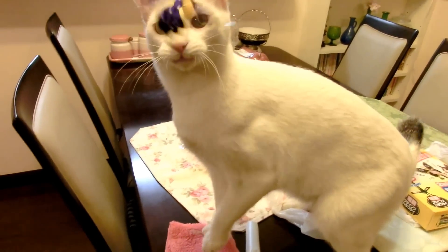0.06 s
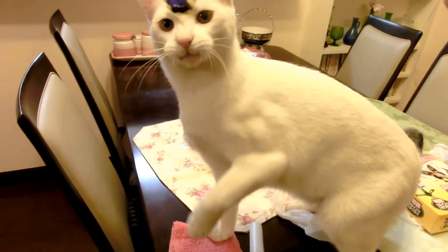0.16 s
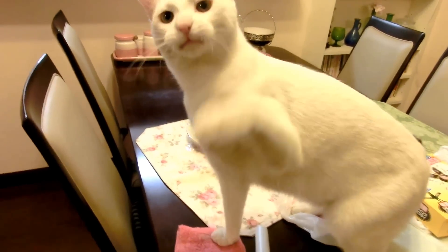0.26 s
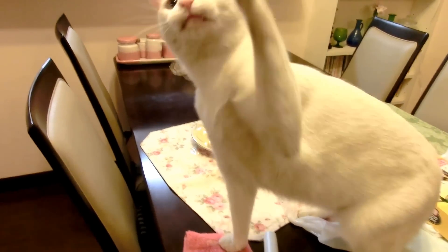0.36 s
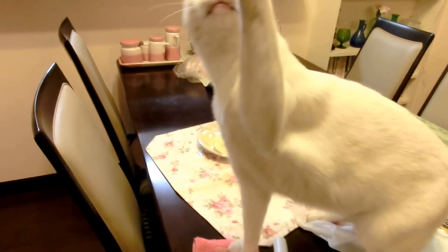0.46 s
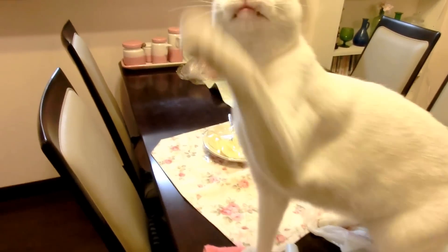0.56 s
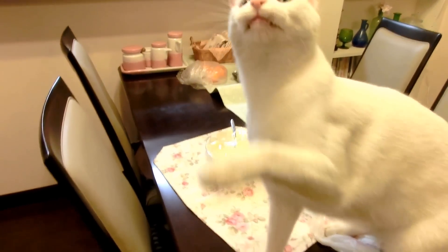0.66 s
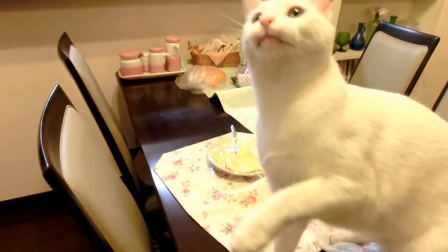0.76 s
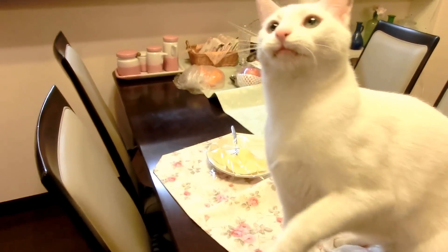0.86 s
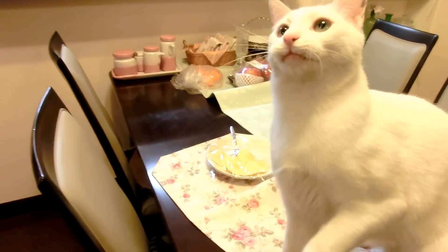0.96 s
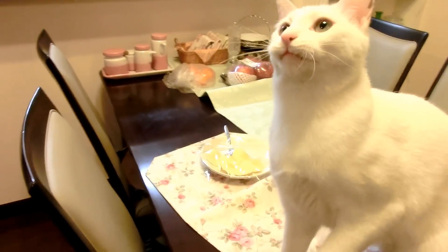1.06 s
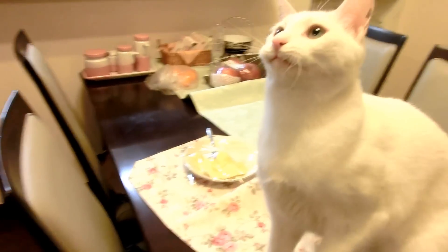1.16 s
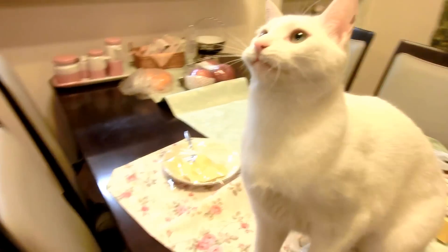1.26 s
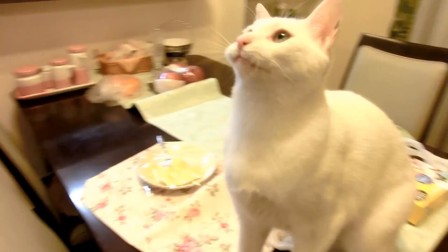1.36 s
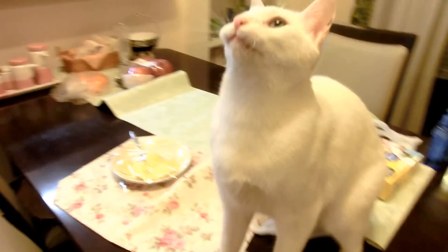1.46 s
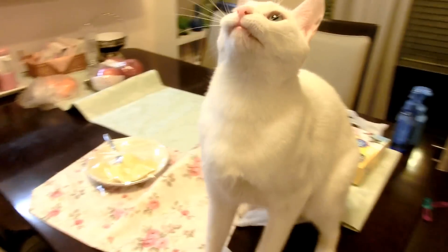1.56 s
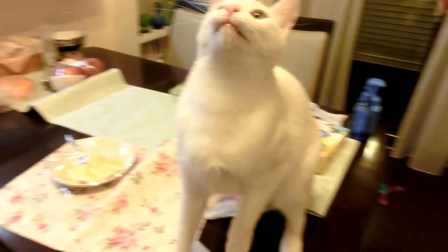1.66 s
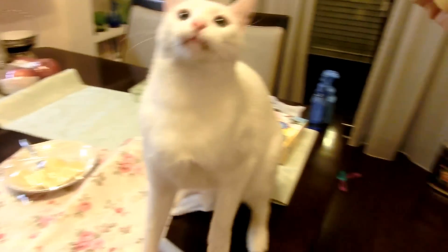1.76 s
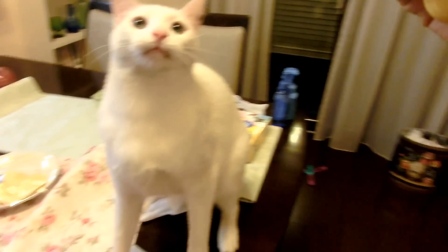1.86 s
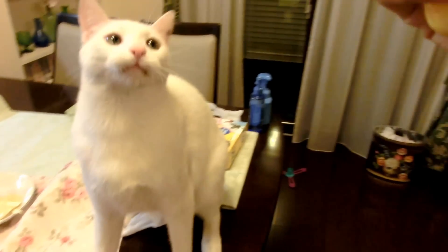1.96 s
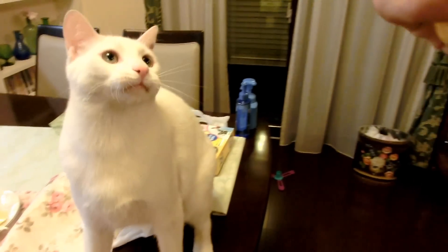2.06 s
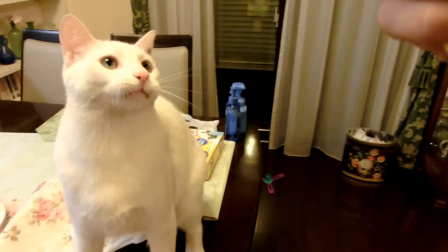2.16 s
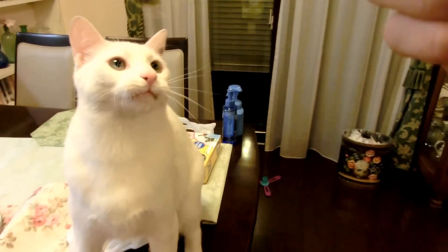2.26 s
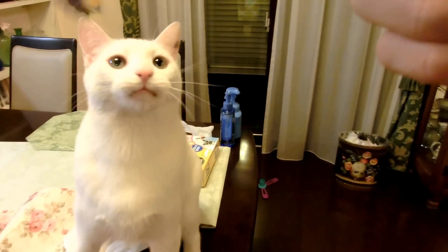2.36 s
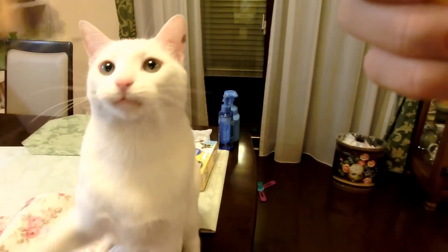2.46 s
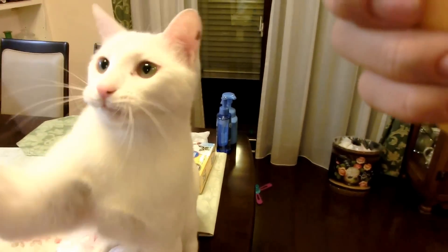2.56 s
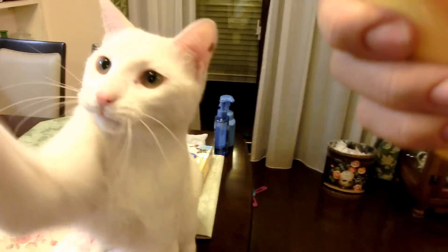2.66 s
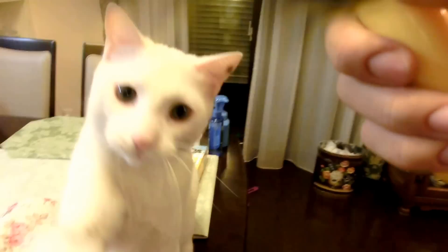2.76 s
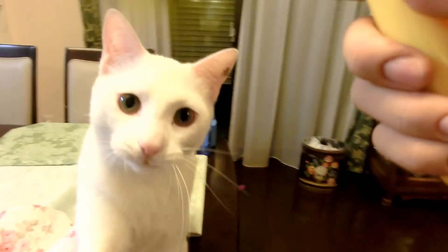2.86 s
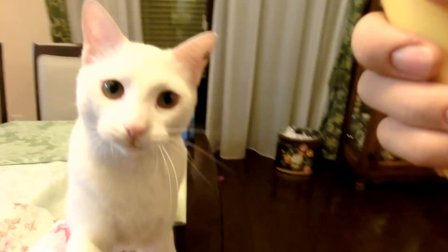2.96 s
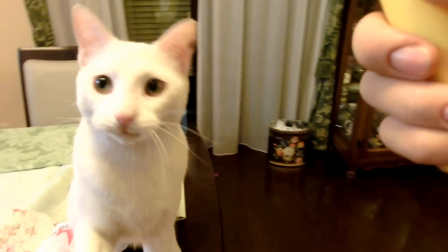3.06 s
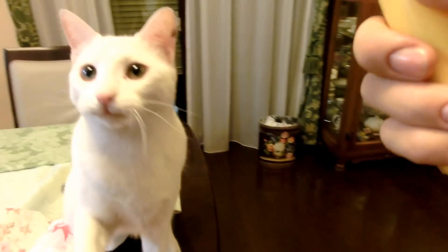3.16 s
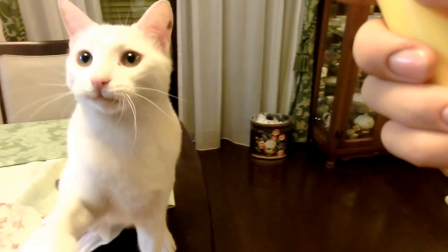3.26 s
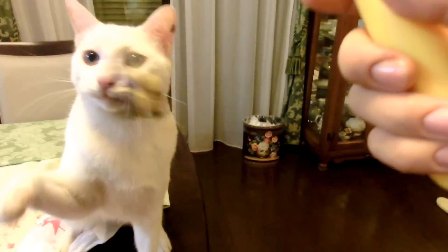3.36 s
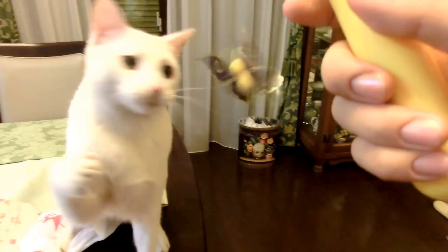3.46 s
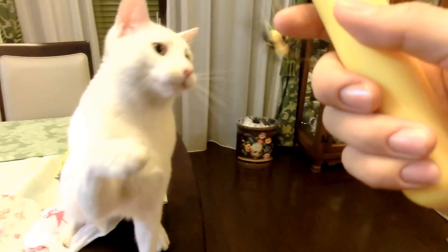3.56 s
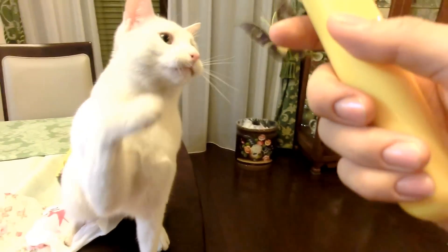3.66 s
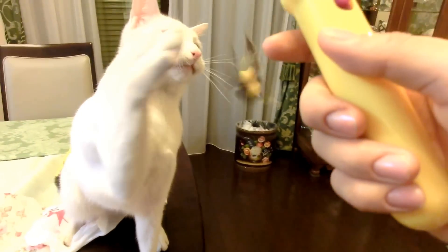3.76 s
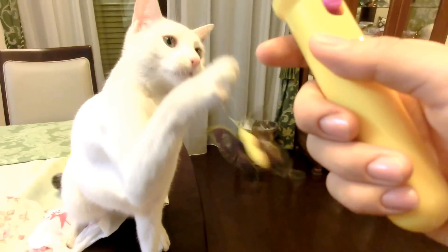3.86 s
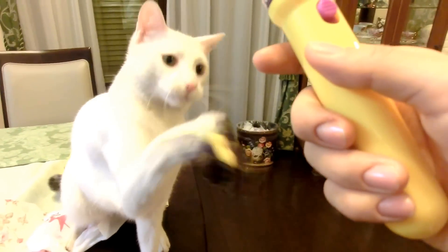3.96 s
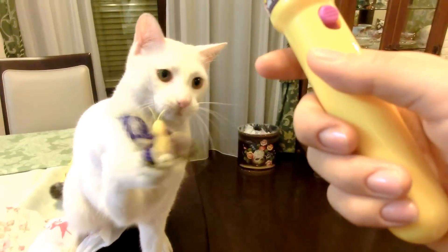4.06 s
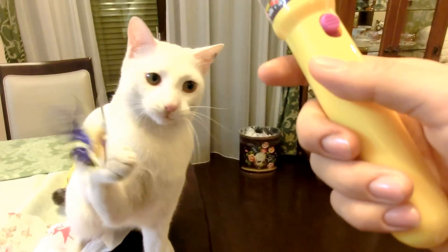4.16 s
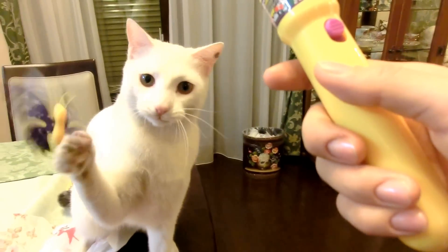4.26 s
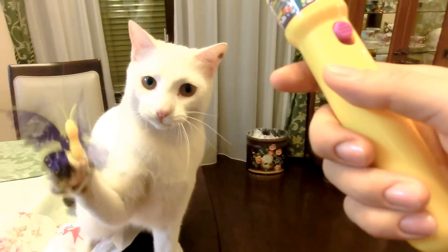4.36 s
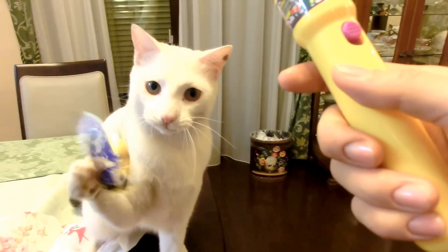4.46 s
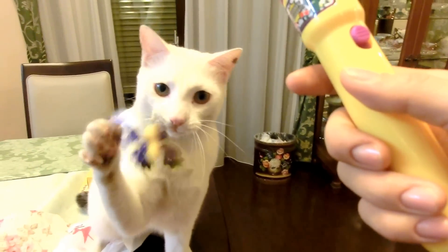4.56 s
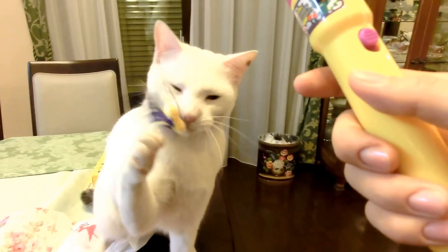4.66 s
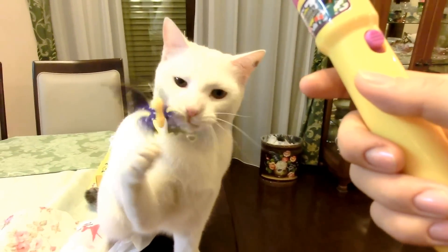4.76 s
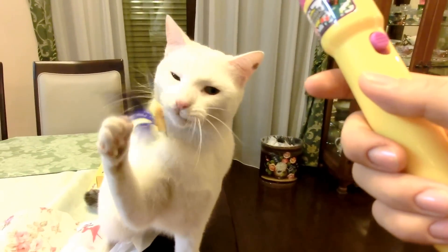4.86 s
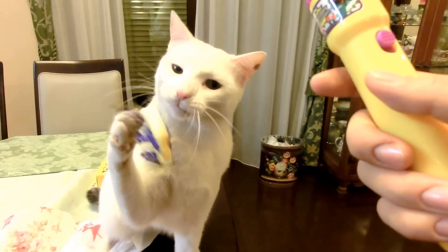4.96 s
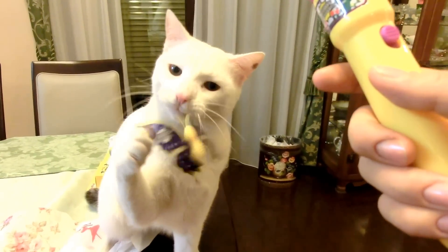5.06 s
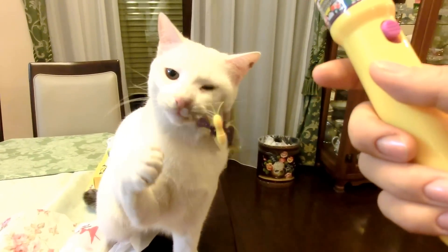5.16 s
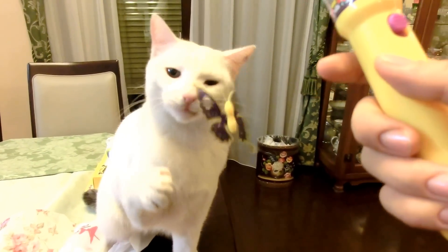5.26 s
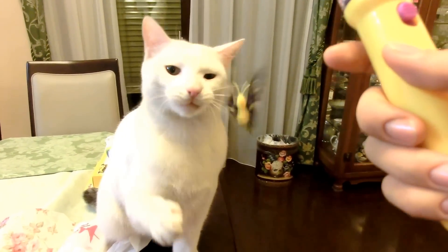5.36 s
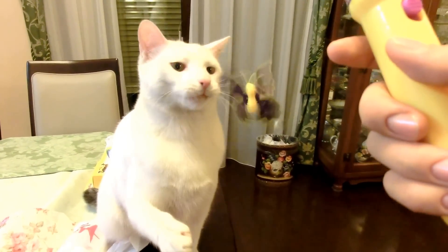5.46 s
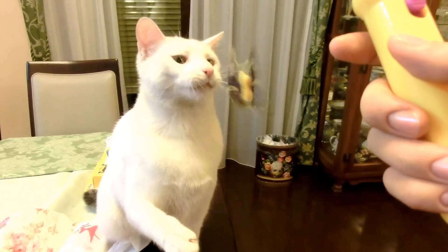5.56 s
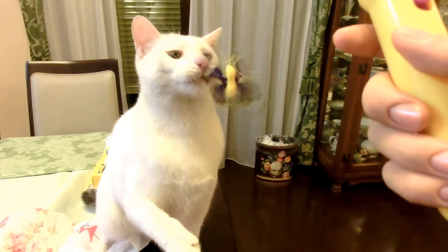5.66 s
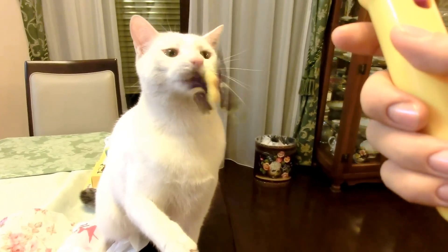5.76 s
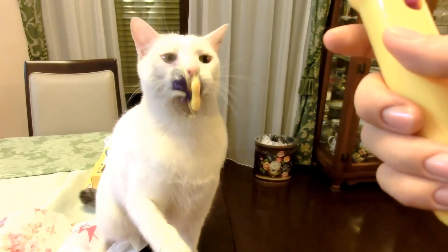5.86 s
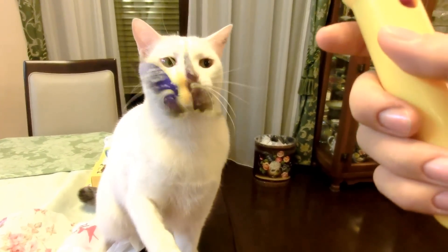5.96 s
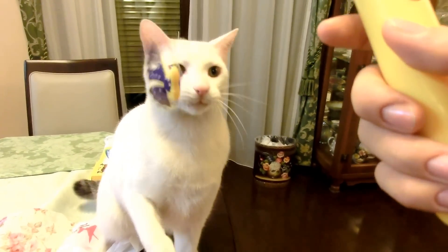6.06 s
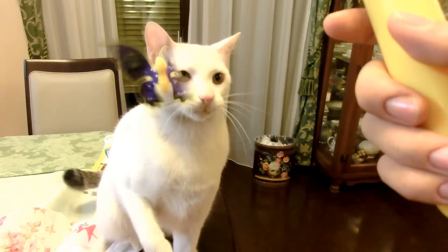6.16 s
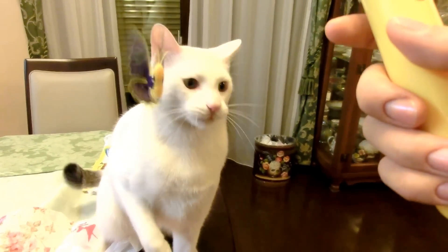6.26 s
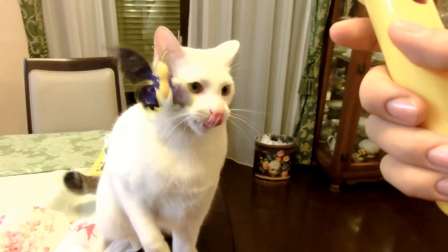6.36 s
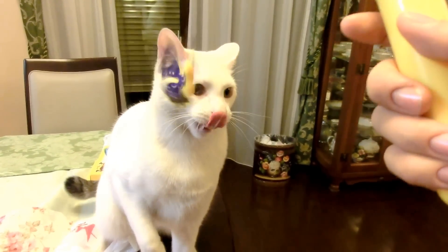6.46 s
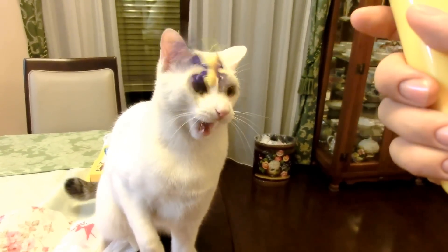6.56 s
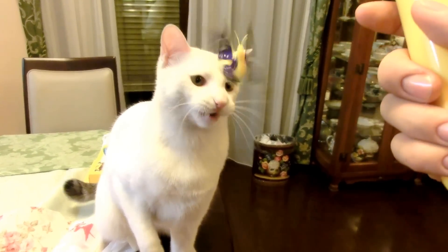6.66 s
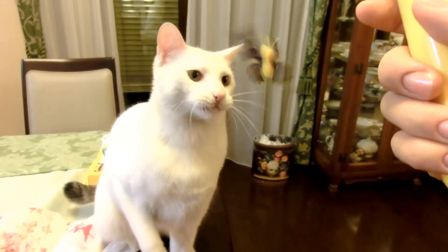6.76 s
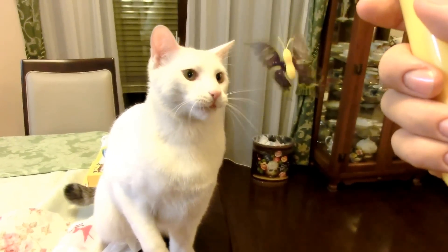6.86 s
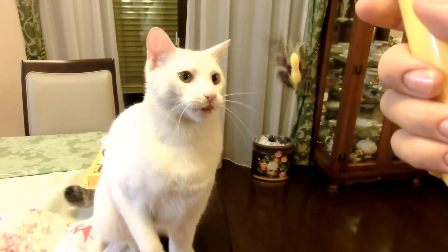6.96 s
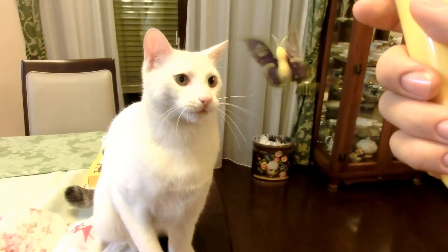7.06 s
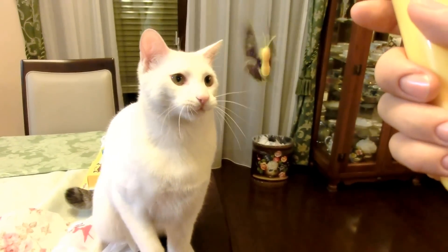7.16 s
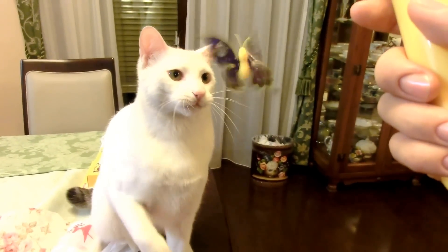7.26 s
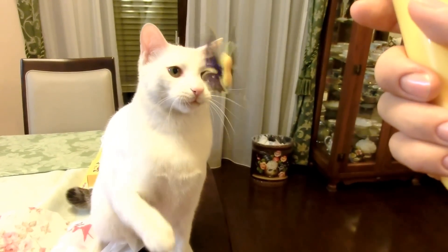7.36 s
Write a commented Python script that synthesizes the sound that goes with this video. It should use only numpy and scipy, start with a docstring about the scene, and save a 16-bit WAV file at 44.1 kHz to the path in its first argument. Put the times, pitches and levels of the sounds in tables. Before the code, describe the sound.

A small motor toy clacks and rattles about twenty-five times a second, bursts into a loud thumping crackle against the microphone, then resumes more quietly indoors.

```python
"""A furnished dining room, where a hand-held motor toy flaps a plastic butterfly about 25 times a second. Each
beat is a tick, a clack and a loose rattle: short bursts of noise that ring the plastic and the handle. Once the
wings beat against the microphone itself, with low thumps, rumble and crackling film. A paw drags on the table
top, made of soft slips that ring the board. The room's hum and hiss are bands of noise; the background level
dips for a while after the wings hit the microphone, then recovers."""
import sys
import numpy as np
from scipy import signal
from scipy.io import wavfile
from scipy.ndimage import uniform_filter1d

SR = 44100
rng = np.random.default_rng(int(sys.argv[2]) if len(sys.argv) > 2 else 0)


def elevation(decibels):
    """Turn decibel levels (scalar or array-like) into linear amplitude ratios."""
    levels = np.asarray(decibels, float)
    return 10 ** (levels / 20)


def int16_out(signal):
    """Quantize to a 16-bit WAV file."""
    q = np.round(np.clip(np.atleast_2d(signal).T, -1, 1) * 32767)
    wavfile.write(sys.argv[1], SR, q.astype(np.int16))


N = 326781

# background before the trims in room() and scene(): start_s, room_level_db, whir_and_rattle_level_db
BACKGROUND = [(0, -52.5, -42.5), (.45, -55, -44), (.51, -53.5, -40.5), (.67, -53, -39), (.8, -52.5, -41.5),
              (.9, -52.5, -42.5), (1.2, -53, -42), (1.65, -52.5, -41.5), (2.1, -53.5, -43.5),
              (2.55, -53.5, -41.5), (2.7, -49, -40), (2.79, -45, -39), (3.1, -52, -56), (3.2, -56.5, -51),
              (3.27, -58.5, -44), (3.34, -57, -44), (3.45, -63, -52.5), (3.7, -59, -51),
              (3.88, -60.5, -48.5), (3.93, -58, -48.5), (4.05, -59.5, -52.5), (4.22, -60, -51),
              (4.3, -57, -46.5), (4.55, -57, -48), (4.68, -57.5, -48.5), (4.9, -54.5, -43),
              (5.05, -53, -43.5), (5.2, -52.5, -47), (5.36, -55.5, -44.5), (5.42, -51, -43.5),
              (5.7, -53, -44.5), (6.5, -53.5, -44.5), (6.95, -52.5, -43.5), (7.41, -54, -44.5)]
# loudness of the room noise over pitch, relative: pitch_hz, level_db (per Hz)
ROOM_SPECTRUM = [(12, -60), (20, 3), (46, -2.5), (167, -10.5), (245, -12.5), (309, -9.5), (540, -17),
                 (980, -14), (1680, -23.5), (2000, -10.5), (2600, -33), (4400, -120)]
# loudness of the motor whir over pitch, relative: pitch_hz, level_db (per Hz)
WHIR_SPECTRUM = [(1000, -40), (1700, -24), (2390, 10), (2810, -1), (3360, 4.5), (6890, 9.5), (10700, 5),
                 (13000, -20), (15400, -18), (16300, -28)]
# how alike left and right are: pitch_hz, likeness (0 to 1)
LEFT_RIGHT_LIKENESS = [(60, 0.77), (200, 0.74), (700, 0.74), (2400, 1), (4400, 0.89), (8000, 0.65),
                       (15000, 0.35)]
# drags of the paw on the table: middle_s, level_db
PAW_DRAGS = [(1.712, -43.5), (1.81, -62.5), (5.91, -55)]
# ringing tones of the table top: pitch_hz, width_hz, level_db
TABLE_MODES = [(162, 42, 1), (240, 60, -15), (313, 29, 1), (510, 98, 2), (680, 110, -13), (810, 66, -19),
               (1060, 120, -14), (1450, 600, -8)]
# wings against the microphone: start_s, air_level_db (air in the ports), film_level_db (crackling film)
WING_BUFFET = [(2.808, -84, -80), (2.815, -27, -35), (2.85, -29, -27), (2.865, -30, -55), (2.9, -29, -35),
               (2.939, -28.5, -31), (2.972, -36, -75), (2.99, -36.5, -27), (3.037, -35.5, -81),
               (3.055, -25.5, -29), (3.075, -35.5, -41), (3.091, -44, -67), (3.12, -59.5, -79),
               (3.14, -81, -89)]
# thumps of the wings on the microphone: start_s, peak_level_db
WING_THUMPS = [(2.813, -25.5), (2.825, -33), (2.839, -20.5), (2.851, -28), (2.862, -41), (2.8713, -12),
               (2.886, -21), (2.921, -20), (2.93, -34), (2.953, -31), (3.004, -32), (3.043, -19.5),
               (3.053, -43)]
# hardest knocks of the motor in the handle: start_s, peak_level_db
MOTOR_KNOCKS = [(0.527, -35), (0.685, -45), (0.74, -46), (1.136, -40.5), (2.417, -43), (2.496, -39),
                (4.223, -43.5), (4.473, -43), (4.492, -41), (4.724, -43.5), (4.971, -37.5), (5.037, -41.5),
                (5.118, -36.5), (5.164, -40), (5.2, -39), (5.398, -38.5), (5.505, -35), (5.817, -39.5),
                (6.091, -40.5), (6.759, -39)]
# ringing tones of the hollow handle: pitch_hz, width_hz, level_db
HANDLE_MODES = [(850, 70, 12), (1002, 160, 19.5), (1290, 390, 18.5)]
# ringing tones of the plastic shell and wings: pitch_hz, width_hz, level_db
SHELL_MODES = [(2280, 760, 6), (3330, 620, 1.5), (4600, 1670, -2), (5900, 900, -1.5), (7580, 1030, -1.5),
               (8800, 850, 1), (9700, 770, 1.5), (10800, 700, 3), (11980, 950, 0), (12730, 350, -2),
               (13920, 930, -2)]
# ticks and clacks of the crank and wings: start_s, peak_level_db, colour_centre_hz, length_ms
WING_CLACKS = [(0.0305, -22.5, 5300, 2.1), (0.034, -23, 7400, 2.7), (0.069, -27, 5900, 2.1),
               (0.0746, -21, 5600, 1.8), (0.1153, -20, 9450, 2.2), (0.154, -19.5, 8400, 3.2),
               (0.1934, -20, 9400, 1.1), (0.231, -18.5, 8800, 2), (0.272, -19.5, 9100, 1.6),
               (0.312, -19.5, 8800, 2.2), (0.349, -19, 8100, 3.4), (0.389, -21.5, 7500, 1.5),
               (0.424, -25.5, 6300, 0.51), (0.4289, -26, 6960, 1.2), (0.468, -21, 4370, 1.5),
               (0.4915, -31, 4500, 6), (0.507, -18.5, 5900, 4.3), (0.514, -24, 6540, 7.7),
               (0.5463, -21.5, 6600, 9.6), (0.5776, -24.5, 10100, 2.8), (0.5814, -15, 10800, 0.98),
               (0.6139, -27, 3800, 9.2), (0.621, -16.5, 7800, 6.4), (0.6428, -20.5, 4740, 1.5),
               (0.648, -18.5, 6530, 6.2), (0.6662, -29.5, 5600, 0.6), (0.672, -31, 5500, 1.5),
               (0.705, -17.5, 8800, 3.1), (0.742, -10.5, 8050, 2), (0.7893, -33, 6500, 2.1),
               (0.82, -25, 5400, 1.03), (0.826, -24.5, 6470, 1.3), (0.8608, -15, 8600, 0.9),
               (0.904, -33.5, 6400, 2.4), (0.946, -19, 6800, 2.1), (0.9795, -20, 6840, 6.7),
               (1.02, -22, 5950, 2.8), (1.0633, -18, 8930, 1.83), (1.0997, -12.5, 8550, 0.94),
               (1.1368, -13, 8510, 1.2), (1.18, -19, 8800, 0.92), (1.22, -19, 8500, 1.2),
               (1.2545, -15, 8260, 1.6), (1.296, -22, 8800, 3.5), (1.339, -20, 7280, 2.1),
               (1.375, -16, 9400, 0.92), (1.4134, -17, 6700, 1.5), (1.456, -23, 8000, 1.74),
               (1.479, -29.5, 8000, 2.2), (1.49, -19, 3700, 0.76), (1.495, -21, 8070, 1.5),
               (1.5302, -13.5, 8800, 1.25), (1.572, -25.5, 6750, 2.7), (1.6133, -20, 8800, 1.7),
               (1.649, -18, 7030, 2.4), (1.688, -16.5, 7800, 1), (1.7, -28.5, 3200, 2.4),
               (1.7245, -24.5, 3600, 1.75), (1.731, -21, 8060, 1.5), (1.753, -32.5, 7190, 0.9),
               (1.7632, -29.5, 3700, 2.9), (1.769, -23.5, 7900, 1.5), (1.807, -18.5, 6440, 0.8),
               (1.818, -26.5, 3370, 1.5), (1.85, -20.5, 6080, 0.75), (1.883, -24, 3230, 1.2),
               (1.887, -25, 8140, 1.2), (1.9205, -20, 5460, 1.06), (1.9244, -21, 7000, 1.9),
               (1.9597, -28, 4480, 2.3), (1.9656, -20, 8800, 1.7), (2, -23.5, 5410, 2),
               (2.0063, -18.5, 9000, 1.2), (2.043, -18, 8000, 1.17), (2.082, -17, 9300, 1.5),
               (2.1245, -20.5, 9050, 1.74), (2.1623, -21.5, 5900, 1.7), (2.2, -15.5, 6910, 1.2),
               (2.202, -22.5, 4500, 7.3), (2.2424, -22.5, 6300, 2.2), (2.2756, -25.5, 4950, 1.85),
               (2.2826, -23.5, 8000, 2), (2.319, -14.5, 7460, 2.05), (2.3223, -17, 4600, 1),
               (2.3585, -17.5, 8500, 1.5), (2.4016, -23.5, 7520, 1.6), (2.4385, -22.5, 7580, 0.58),
               (2.4733, -21.5, 5040, 0.94), (2.475, -21.5, 6800, 3.6), (2.517, -27.5, 7460, 3.3),
               (2.558, -19, 6740, 1.2), (2.594, -20.5, 5950, 4.5), (2.5988, -21, 3700, 5.7),
               (2.6338, -18.5, 6260, 3.6), (2.6761, -16, 6180, 0.72), (2.712, -18.5, 6160, 5.4),
               (2.732, -16, 7070, 4.7), (2.7571, -20.5, 6240, 4.2), (2.795, -21.5, 6600, 1.8),
               (2.815, -7, 5900, 9.3), (2.838, -14, 7000, 6.9), (2.8439, -3.5, 8350, 1.5),
               (2.8652, -17, 5500, 0.6), (2.8712, -7, 6500, 0.67), (2.8755, 5.5, 4070, 1.7),
               (2.8833, -19, 10000, 2.5), (2.887, -27, 3500, 1.1), (2.894, -17, 7000, 3),
               (2.896, -23, 5000, 1.8), (2.919, -12.5, 4470, 0.8), (2.924, -12, 5770, 3.1),
               (2.933, -13, 5400, 2.1), (2.955, -11, 4600, 2.6), (2.9585, -6, 4960, 2.7),
               (2.982, -22, 9000, 5), (2.9825, -19, 4100, 2.7), (2.987, -12, 5040, 0.48),
               (2.9908, -12, 8100, 4), (3.0053, -11, 7250, 1.1), (3.0142, -8.5, 4500, 0.54),
               (3.0233, -14, 7000, 0.8), (3.025, -9, 6500, 2.4), (3.028, -15, 8500, 2),
               (3.0467, -10, 6040, 3.7), (3.052, -19, 5800, 1.7), (3.059, -14, 6400, 1.9),
               (3.0628, -15, 6370, 3.2), (3.067, -23, 5100, 2.3), (3.1003, -26.5, 5900, 0.46),
               (3.105, -32.5, 7500, 1.3), (3.1203, -28, 6500, 1.8), (3.1461, -27.5, 5130, 2.2),
               (3.1846, -25.5, 6200, 2.9), (3.222, -22.5, 6390, 5.3), (3.26, -22.5, 7100, 5.8),
               (3.265, -23, 6600, 2.9), (3.3002, -21.5, 6250, 1.53), (3.334, -24, 8300, 6.7),
               (3.375, -33.5, 6600, 2.6), (3.4156, -28.5, 6700, 3), (3.453, -31.5, 8610, 2.1),
               (3.4944, -23.5, 5900, 1.6), (3.533, -24.5, 8360, 1.1), (3.573, -29, 8130, 1.2),
               (3.61, -31.5, 5700, 2.5), (3.6492, -33, 7700, 3.2), (3.6844, -31.5, 6260, 0.64),
               (3.687, -31.5, 5900, 3), (3.701, -32, 5100, 2.3), (3.727, -30, 9220, 2.4),
               (3.7398, -34, 5150, 4.1), (3.764, -28.5, 7700, 2.1), (3.778, -35.5, 4200, 2.5),
               (3.8, -31.5, 6100, 0.55), (3.803, -33.5, 6800, 3.1), (3.838, -34, 5830, 1.8),
               (3.842, -32.5, 4600, 1.4), (3.8914, -22.5, 5240, 7.3), (3.9077, -30, 5800, 3.3),
               (3.945, -27.5, 7660, 7.5), (3.9597, -28.5, 5130, 1.5), (4.002, -34.5, 7230, 4.5),
               (4.038, -30.5, 5900, 6.7), (4.071, -36.5, 6500, 2.1), (4.1183, -38, 4730, 1.7),
               (4.1613, -36, 7400, 2.2), (4.1892, -35, 8120, 0.79), (4.228, -37, 8400, 0.9),
               (4.2445, -26.5, 7900, 1.5), (4.281, -26.5, 7200, 1.9), (4.321, -27.5, 6300, 4.3),
               (4.3598, -27.5, 5330, 8.7), (4.392, -30.5, 5100, 9.5), (4.399, -31.5, 5400, 2.4),
               (4.4346, -26, 4970, 0.84), (4.473, -24, 6520, 4.2), (4.511, -24, 7900, 2.1),
               (4.514, -29.5, 4950, 2.9), (4.549, -34.5, 6500, 1.6), (4.574, -32, 8300, 1.6),
               (4.592, -27, 7000, 1.6), (4.6279, -20.5, 8800, 2.9), (4.665, -36, 6530, 1.8),
               (4.71, -21, 5460, 1.23), (4.741, -36.5, 5600, 0.93), (4.767, -29, 6700, 2.7),
               (4.787, -36.5, 4420, 1.7), (4.8261, -20.5, 8200, 3.6), (4.8634, -28, 6050, 2.5),
               (4.871, -30, 6230, 5.8), (4.9042, -24, 9100, 0.85), (4.9068, -21, 5900, 1.2),
               (4.9505, -23, 5140, 1.1), (4.981, -23, 8130, 1.6), (4.9928, -33, 4570, 1.8),
               (5.01, -37.5, 6500, 2.1), (5.058, -33.5, 9400, 1.4), (5.095, -22.5, 10300, 2.1),
               (5.112, -27.5, 7280, 1.9), (5.14, -34, 5840, 1), (5.1505, -24, 5730, 4.1),
               (5.1785, -28.5, 4830, 5.3), (5.2157, -21, 8800, 3.1), (5.251, -32, 3900, 3.5),
               (5.2797, -32.5, 6500, 2.24), (5.2992, -26.5, 5100, 1.6), (5.334, -32, 6460, 1.5),
               (5.4127, -22.5, 7730, 1.9), (5.415, -25, 10200, 3.9), (5.45, -29.5, 6500, 4.3),
               (5.487, -18, 8680, 0.88), (5.523, -25, 8000, 9.6), (5.5628, -19.5, 7000, 0.85),
               (5.606, -30.5, 7680, 5.2), (5.627, -38.5, 8600, 0.93), (5.643, -24, 6800, 1.6),
               (5.681, -20.5, 8350, 2.1), (5.715, -24, 6650, 0.75), (5.7208, -23.5, 5160, 2.1),
               (5.761, -25.5, 10100, 1.8), (5.784, -36.5, 7100, 1.2), (5.795, -23.5, 6000, 0.68),
               (5.7993, -23.5, 6800, 1.4), (5.8369, -20.5, 8000, 1.5), (5.8777, -24, 9100, 1.5),
               (5.912, -29, 5650, 3.4), (5.919, -28.5, 7060, 3.6), (5.9545, -17.5, 7260, 1.6),
               (5.994, -20, 7920, 3.2), (6.0299, -27.5, 6530, 1.2), (6.0364, -27, 7100, 1.9),
               (6.0731, -20.5, 6200, 5.4), (6.112, -20, 7500, 3), (6.152, -22, 8400, 2.7),
               (6.189, -28, 6400, 1.3), (6.1931, -23, 9800, 1.73), (6.215, -27.5, 8530, 1),
               (6.23, -18.5, 7900, 1.5), (6.27, -20.5, 9700, 0.78), (6.3093, -23, 9250, 2.3),
               (6.347, -21, 8800, 2.5), (6.386, -19.5, 7400, 0.84), (6.427, -18, 10100, 1.6),
               (6.465, -23.5, 9200, 2), (6.504, -19.5, 9700, 2.2), (6.5444, -18.5, 8800, 0.77),
               (6.584, -21.5, 9750, 1.9), (6.6217, -18.5, 9700, 2.2), (6.661, -23, 5900, 5),
               (6.703, -20, 10200, 2.2), (6.74, -18.5, 7700, 2.06), (6.7789, -17, 6300, 2.2),
               (6.813, -29.5, 5900, 0.9), (6.819, -29, 8200, 1.9), (6.8571, -19, 8800, 1.2),
               (6.8958, -20.5, 8800, 2.6), (6.936, -21.5, 9500, 1.2), (6.9473, -31.5, 3840, 1.24),
               (6.9758, -24, 9590, 1.6), (7.012, -23, 6150, 5.7), (7.0478, -31, 6970, 2.1),
               (7.0528, -21.5, 8300, 1.2), (7.0642, -30.0, 3800, 3.2), (7.0948, -23, 7750, 2.7),
               (7.129, -27.5, 4600, 3.1), (7.1336, -23.5, 8000, 1.1), (7.1702, -21, 8100, 1.4),
               (7.2118, -24, 8100, 0.6), (7.251, -21.5, 7700, 1.1), (7.289, -20.5, 7740, 2),
               (7.323, -24.5, 6250, 0.72), (7.327, -22.5, 8100, 1.7), (7.368, -19.5, 9300, 1.1)]

DRAG_RISE_DB_PER_S, DRAG_FALL_DB_PER_S, DRAG_HOLD_S = 220, 143, 0.028
# a weak knock at the far end of every stroke
KNOCK_AFTER_MS, KNOCK_OVER_WHIR_DB, KNOCK_SPREAD_DB = 21, -3, 4.5
CLACK_IN_HANDLE_DB = -28   # each clack also rings the handle
PAW_HOLDS_S = (.48, .69)   # a paw holds the wings: no slack in the crank
TOUCH_APART = 4   # touching sounds are nearer one port: the likeness is raised to this power
FIRST_CONTACT = 2.23   # first contact of a clack, against the spread of its chatter


def rms_one(x):
    """Scale to an average strength (rms) of 1."""
    return x / np.sqrt(np.mean(x ** 2) + 1e-20)


def in_time(rows):
    """Draw each level column as a smooth curve, one value a sample."""
    start_s, *columns = np.transpose(rows)
    return [np.interp(np.arange(N) / SR, start_s, column) for column in columns]


def at_hz(points, hz):
    """Read a spectrum on a log-frequency axis."""
    pitch_hz, values = np.array(points)[:, 0], np.array(points)[:, 1]
    return np.interp(np.log(hz), np.log(pitch_hz), values)


def between(s, start_s, end_s):
    """True inside a span of time."""
    return (s > start_s) & (s < end_s)


def drift(rate_hz):
    """Slow random wander of spread 1, made at a twentieth of the sample rate."""
    r = np.exp(-40 * np.pi * rate_hz / SR)
    noise = rng.standard_normal(N // 20 + 2002)
    slow = signal.lfilter([1], [1, -2 * r, r * r], noise)[2000:]
    return np.interp(np.arange(N) / 20, np.arange(len(slow)), rms_one(slow))


def resonate(x, hz, width_hz):
    """Ring at one pitch, like a struck part; gain 1 at that pitch, and a narrow width rings longer."""
    r = np.exp(-np.pi * width_hz / SR)
    gain = (1 - r * r) / 2
    feedback = [1, -2 * r * np.cos(2 * np.pi * hz / SR), r * r]
    return signal.lfilter([gain, 0, -gain], feedback, x + 1e-18)


def to_stereo(mid, side, hz, apart=1):
    """Left and right share the mid part; the share falls in the treble."""
    alike = np.clip(at_hz(LEFT_RIGHT_LIKENESS, hz), 0, 1) ** apart
    shared, own = np.sqrt(1 + alike) * mid, np.sqrt(1 - alike) * side
    return np.array([shared + own, shared - own]) / np.sqrt(2)


def place(rows, shapes):
    """Lay one stereo shape at each row's time, with the row's peak level."""
    size = shapes.shape[-1]
    out = np.zeros((2, N + size))
    for k, row in enumerate(rows):
        at = round(row[0] * SR)
        peak = np.abs(shapes[:, k].mean(axis=0)).max()
        out[:, at:at + size] += elevation(row[1]) * shapes[:, k] / peak
    return out[:, :N]


def banded_noise(spectrum, patchy_db):
    """Fourteen bands of stereo noise, each with its own level and flicker; rms 1."""
    out, together = 0, drift(3.8)
    edges = np.geomspace(spectrum[0][0], min(spectrum[-1][0], .45 * SR), 15)
    white = rng.standard_normal((2, 2, N))
    for k, (low, high) in enumerate(zip(edges, edges[1:])):
        band = signal.butter(2, [low, high], "band", fs=SR, output="sos")
        mid, side = signal.sosfilt(band, white[k % 2])
        hz = np.sqrt(low * high)
        flicker_db = patchy_db * (0.33 * together + drift(48.0))
        out = out + elevation(at_hz(spectrum, hz) + flicker_db) * to_stereo(mid, side, hz)
    return rms_one(out)


def small_body(x):
    """Parts this small radiate little below their lowest mode."""
    return signal.sosfilt(signal.butter(4, 2060, "high", fs=SR, output="sos"), x + 1e-18)


def crackle(per_s, spread_db, apart=1):
    """Tiny uneven clicks dealt to the shell's ringing tones; rms 1."""
    size_db = spread_db * np.minimum(rng.exponential(1, (2, N)), 4)
    sizes = elevation(size_db) * rng.choice([-1, 1], (2, N))
    grains = sizes * (rng.random(N) < per_s / SR)
    dealt, out = rng.integers(0, len(SHELL_MODES), (2, N)), 0
    for k, (hz, width_hz, level_db) in enumerate(SHELL_MODES):
        rings = resonate(grains * (dealt == k).any(axis=0), hz, width_hz)
        out = out + elevation(level_db) * to_stereo(*rings, hz, apart)
    return rms_one(small_body(out))


def main_clacks(rows):
    """Pick the loudest contact of each beat, while the wings swing free of the microphone."""
    apart_s = rows[:, :1] - rows[:, 0]
    loudest_near = np.where(np.abs(apart_s) < .018, rows[:, 1], -200).max(axis=1)
    on_microphone = between(rows[:, 0], WING_BUFFET[0][0], WING_BUFFET[-1][0])
    return (rows[:, 1] >= loudest_near) & ~on_microphone


def room(room_db):
    """Hum and hiss of the room: noise that is strongest in the bass."""
    return elevation(room_db + 1.0) * banded_noise(ROOM_SPECTRUM, patchy_db=2.0)


def paw():
    """Dense soft slips of a dragging paw excite the ringing tones of the table top."""
    slips = rng.standard_normal((2, N)) * elevation(1.0 * drift(67.0))
    board = 0
    for hz, width_hz, level_db in TABLE_MODES:
        rings = rms_one(resonate(slips, hz, width_hz))
        board = board + elevation(level_db) * to_stereo(*rings, hz, 0.12)
    t = np.arange(N) / SR
    swell = 0
    # each drag swells fast, holds on either side of its middle and fades
    for middle_s, level_db in PAW_DRAGS:
        rise_db = DRAG_RISE_DB_PER_S * (t - middle_s + DRAG_HOLD_S)
        fall_db = DRAG_FALL_DB_PER_S * (middle_s + DRAG_HOLD_S - t)
        swell = swell + elevation(level_db + np.minimum(0, np.minimum(rise_db, fall_db)))
    return swell * rms_one(board)


def buffet(beats):
    """Lumpy low noise, partly its own in each port, the case shaken by slaps, and crackling wing film."""
    air_db, film_db = in_time(WING_BUFFET)
    noise = to_stereo(*rng.standard_normal((2, N)), 200)
    low = signal.sosfilt(signal.butter(1, [35.0, 150.0], "band", fs=SR, output="sos"), noise)
    rub = signal.sosfilt(signal.butter(2, [140.0, 650.0], "band", fs=SR, output="sos"), noise)
    jerks_db = 6 * drift(120)
    slaps = np.sqrt(np.abs(uniform_filter1d(np.abs(beats[0]), size=300)) / elevation(-29.0))
    film = crackle(3000 * elevation(jerks_db), spread_db=5.5, apart=TOUCH_APART)
    shaken_air = rms_one(low) + elevation(-9) * slaps * rms_one(rub)
    return elevation(air_db + 2.5 * drift(50)) * shaken_air + elevation(film_db) * film


def thumps(size=1500):
    """A wing presses air on the ports, the left one more and first: a push that swings back and dies."""
    t = np.arange(size) / SR
    chance = rng.standard_normal((len(WING_THUMPS), 2))
    hz = 96.0 * 2 ** (0.12 * chance[:, :1])
    left_db = 2.0 + 0.8 * chance[:, 1:]
    sides = []
    for lag_s, side_db in ((0, left_db), (.0016, -left_db)):
        late = np.maximum(t - lag_s, 0)
        envelope = np.exp(-late / 0.003) * (1 - np.exp(-late / 0.0017))
        sides.append(-elevation(side_db) * np.sin(2 * np.pi * hz * late) * envelope)
    return place(WING_THUMPS, np.array(sides))


def whir():
    """Whir of the motor: flickering bands of mid and treble noise, rms 1."""
    return banded_noise(WHIR_SPECTRUM, patchy_db=4.5)


def knocks(size=1200):
    """A soft blow of about a millisecond rings the handle, each tone with its own strength."""
    contacts = np.array(WING_CLACKS)
    main = contacts[main_clacks(contacts), :2]
    beat_s = main[:, 0] + KNOCK_AFTER_MS / 1000
    whir_db = np.interp(beat_s, np.array(BACKGROUND)[:, 0], np.array(BACKGROUND)[:, 2])
    chance = rng.standard_normal((len(MOTOR_KNOCKS) + 2 * len(beat_s), 2 + len(HANDLE_MODES)))
    weak = np.c_[beat_s, whir_db + KNOCK_OVER_WHIR_DB]
    weak = weak + chance[-len(beat_s):, :2] * [.002, KNOCK_SPREAD_DB]   # uneven time (s) and level
    rows = np.r_[MOTOR_KNOCKS, main + [0, CLACK_IN_HANDLE_DB], weak]
    blow = np.zeros((len(rows), size))
    blow[:, :60] = np.hanning(60) * np.sin(np.arange(60) * 2 * np.pi / 44)
    rings = []
    for k, (hz, width_hz, level_db) in enumerate(HANDLE_MODES):
        strength = elevation(level_db + 4.8 * chance[:, 2 + k, None])
        rings.append(strength * resonate(blow, hz, width_hz))
    return place(rows, to_stereo(sum(rings), rings[0] - rings[-1], HANDLE_MODES[1][0]))


def rattle(beats):
    """Loose parts shake after each clack and at the far end of the stroke; the handle booms faintly."""
    force = uniform_filter1d(np.abs(beats[0]), size=60)
    r = np.exp(-1 / (0.0031 * SR))
    after = signal.lfilter([(1 - r) ** 2], [1, -2 * r, r * r], force)
    far_end = np.roll(force, round(0.024 * SR))
    shaken = after + 0.18 * far_end
    usual = uniform_filter1d(2 * shaken + 1e-9, size=SR // 8)
    shaken = 0.5 + 2 * np.tanh(shaken / usual)   # the play of the parts is limited
    jolts = (rng.random(N) < 60.0 * shaken / SR) * rng.standard_normal(N)
    boom = sum(elevation(level_db) * resonate(jolts, hz, width_hz) for hz, width_hz, level_db in HANDLE_MODES)
    clicks_per_s = 3500.0 * shaken * elevation(3.0 * drift(150.0))
    loose = np.sqrt(shaken) * crackle(clicks_per_s, spread_db=4.5)
    return rms_one(loose) + elevation(-19.5) * rms_one(boom)


def with_lead_ticks(rows):
    """Crank slack gives a duller tick about 5 ms before a main clack; a faint bright one ends the stroke."""
    start_s, level_db = rows[:, 0], rows[:, 1]
    apart_s = rows[:, :1] - start_s
    clear_before = ~between(apart_s, 0, .009).any(axis=1) & ~between(start_s, *PAW_HOLDS_S)
    chance = rng.standard_normal((len(rows), 6))
    length_ms = .6 + .2 * chance[:, 3]
    ticks = np.c_[start_s - .0052 + .0009 * chance[:, 0], level_db - 10 + 2 * chance[:, 1],
                  5500 + 900 * chance[:, 2], length_ms]
    ends = np.c_[start_s + .023 + .0015 * chance[:, 4], level_db - 13.0 + 3 * chance[:, 5],
                 10000 + 1000 * chance[:, 2], length_ms]
    main = main_clacks(rows)
    return np.r_[rows, ticks[main & clear_before], ends[main]]


def clacks(size=600):
    """Each contact is a short chatter of plastic that rings the tones near its own colour most."""
    rows, t = with_lead_ticks(np.array(WING_CLACKS)), np.arange(size) / SR
    chatter_s = np.clip(.5 * rows[:, 3:4] - .2, .08, 4) / 1000
    chance = rng.standard_normal((len(rows), 2 * size + len(SHELL_MODES)))
    attack = 1 - np.exp(-t / (0.061 * chatter_s))
    decay = np.exp(-(t / chatter_s) ** 1.29) + 0.15 * np.exp(-t / 0.0031)
    envelope = attack * decay
    mid, side = chance[:, :size] * envelope, chance[:, size:2 * size] * envelope
    mid[:, 2] += FIRST_CONTACT * np.sign(chance[:, 0])
    touching = between(rows[:, :1], WING_THUMPS[3][0], WING_BUFFET[-1][0])
    apart = np.where(touching, TOUCH_APART, 1)
    shapes = 0
    for k, (hz, width_hz, level_db) in enumerate(SHELL_MODES):
        colour_db = -6.0 * np.log2(hz / rows[:, 2:3]) ** 2 + 2.0 * chance[:, -1 - k, None]
        rings = resonate(np.array([mid, side]), hz, width_hz)
        # each tone takes its share of the blow
        rings = rings * np.sqrt(width_hz / np.mean(rings ** 2, axis=-1, keepdims=True))
        shapes = shapes + (-1) ** k * elevation(level_db + colour_db) * to_stereo(*rings, hz, apart)
    return place(rows, small_body(shapes))


def scene():
    """Toy over the room, both a little to the left, with the paw and the touched microphone added."""
    room_db, whir_db = in_time(BACKGROUND)
    beats = clacks()
    toy = beats + knocks() + elevation(whir_db - 5.0) * rattle(beats) + elevation(whir_db - 8.0) * whir()
    lean_left = elevation(np.array([[.5], [-.5]]))
    return (toy + room(room_db)) * lean_left + paw() + thumps() + buffet(beats)


def roll_off(x):
    """The treble ends steeply here."""
    return signal.sosfilt(signal.butter(12, 16440, fs=SR, output="sos"), x)


def record(dry):
    """The top is cut from 16400 Hz up, and the hardest blow overloads."""
    cut = signal.sosfilt(signal.cheby2(10, 50, 16400, fs=SR, output="sos"), dry)
    return roll_off(np.clip(cut, -1, 1))


dry = scene()
out = record(dry)
int16_out(out)
```